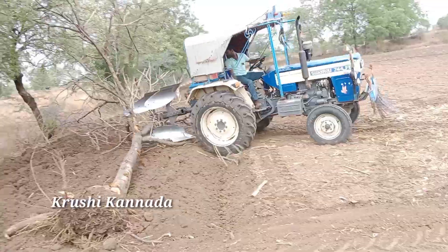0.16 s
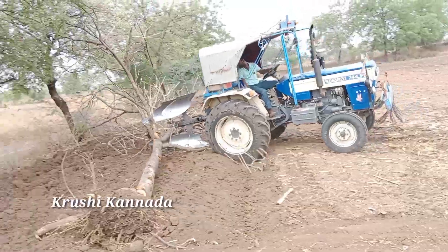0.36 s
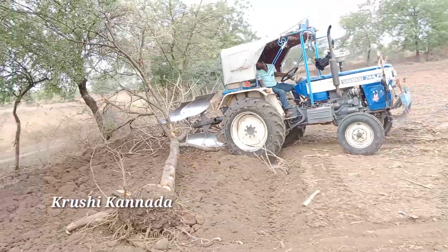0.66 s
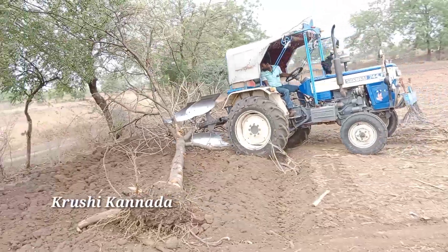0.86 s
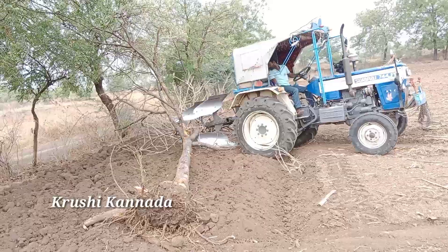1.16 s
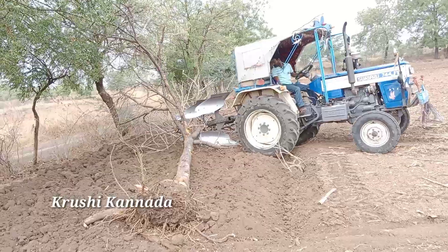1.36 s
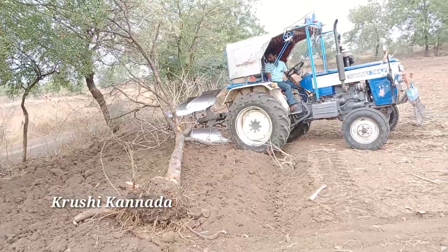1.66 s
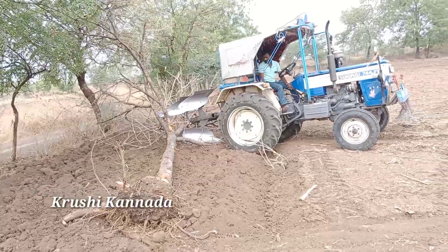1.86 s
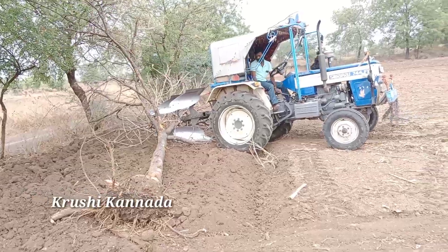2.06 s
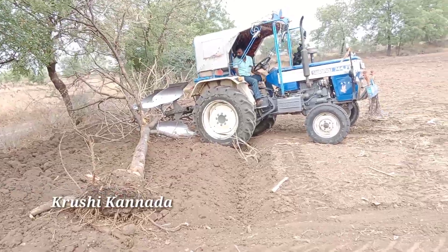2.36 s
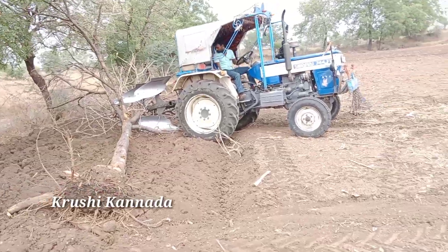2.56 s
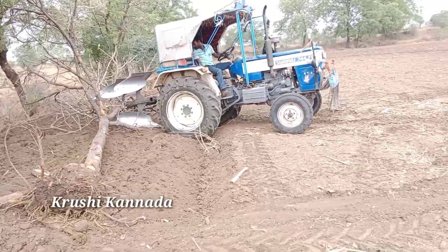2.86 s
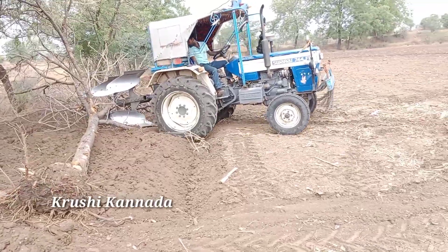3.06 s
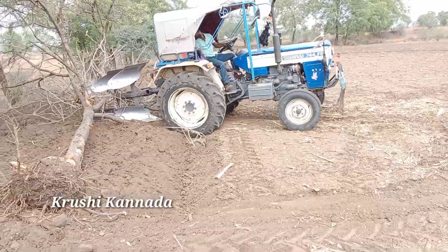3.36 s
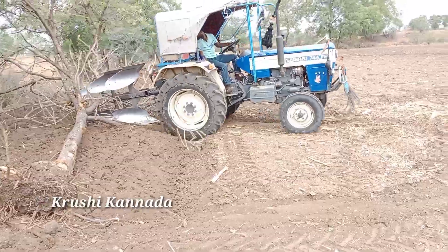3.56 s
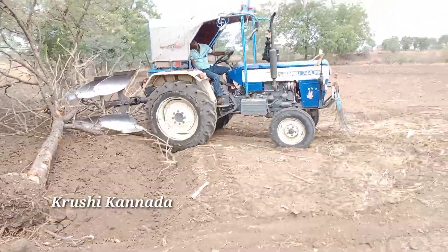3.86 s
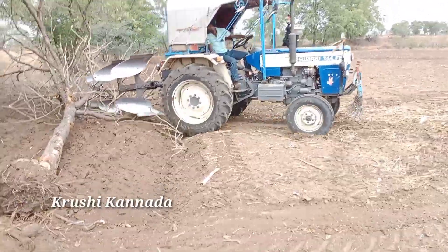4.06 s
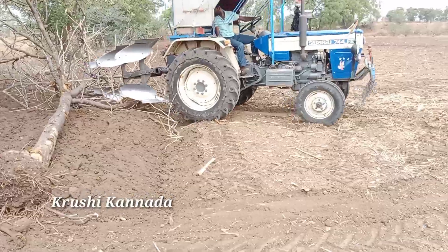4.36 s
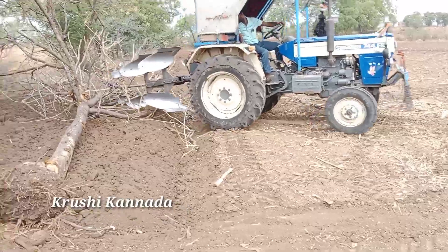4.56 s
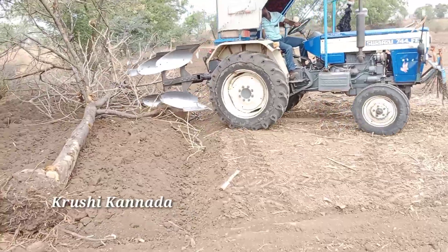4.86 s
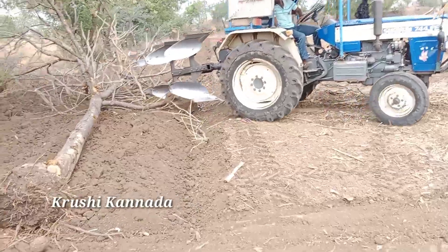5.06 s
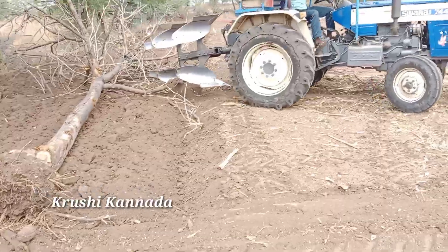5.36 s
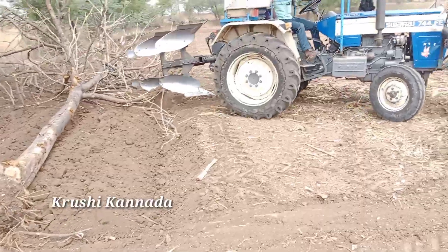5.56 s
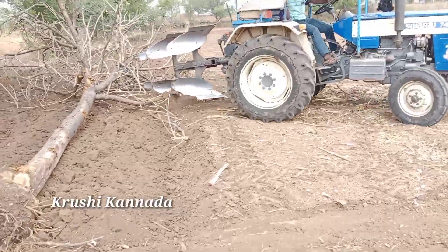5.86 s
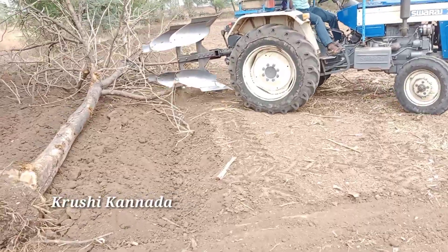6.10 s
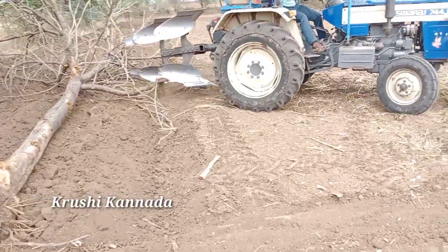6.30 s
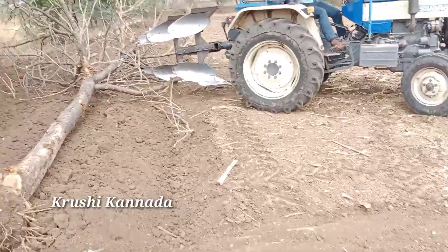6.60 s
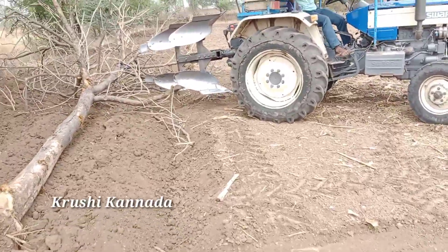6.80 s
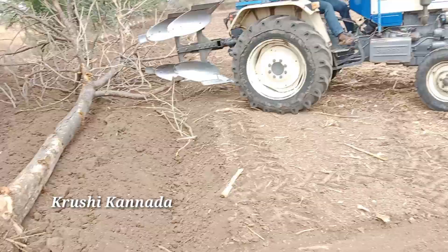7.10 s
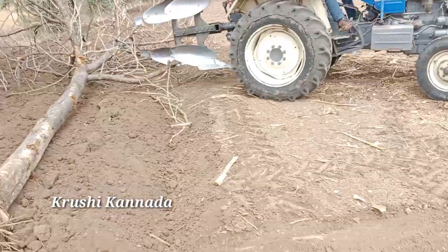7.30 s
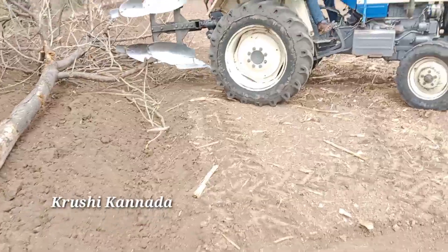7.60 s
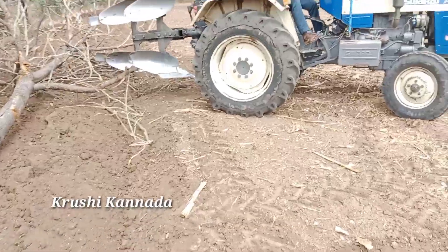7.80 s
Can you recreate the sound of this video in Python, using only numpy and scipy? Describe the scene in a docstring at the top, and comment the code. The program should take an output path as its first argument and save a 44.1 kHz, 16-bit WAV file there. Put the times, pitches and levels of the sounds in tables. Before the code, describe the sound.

In an open dry field, a three-cylinder diesel tractor pulls hard with loud barking exhaust, sharp wood cracks and low knocks. After a second it falls off to a soft, quick clatter with a faint gear whine, then surges again with rasping barks, scraping soil and branch squeaks. Finally it slows into uneven, honking chugs with small tin rattles. Mono microphone outdoors, a short distance away.

```python
"""Dry field: a three-cylinder diesel tractor drags its plough through a felled tree.
It pulls hard, eases off and slows, then labours: exhaust and intake are pulses timed by a firing table.
Block, bonnet and gears are noise shaped by the firings or narrow bands that follow engine speed.
Wood cracks and tin rattles in decaying noise bursts; low knocks and squeaks are gliding tones.
Dry soil and twigs crunch in treble noise and random ticks that follow the load."""
import sys
import numpy as np
from scipy import signal
from scipy.fft import rfft, irfft, next_fast_len
from scipy.io import wavfile
from scipy.ndimage import uniform_filter1d

SR = 44100
rng = np.random.default_rng(int(sys.argv[2]) if len(sys.argv) > 2 else 0)


def wav_out(sig):
    """Save sig, one row per channel (or a flat mono array), as 16-bit PCM at SR to the path in sys.argv[1]."""
    wavfile.write(sys.argv[1], SR, np.round(np.clip(np.atleast_2d(sig).T, -1, 1) * 32767).astype(np.int16))


N = 350154
T = np.arange(N) / SR  # [s]

# Crankshaft: (time [s], firings so far)
CRANK = [(-.017, 2), (.62, 17), (.926, 24), (1.548, 38), (1.947, 46), (2.41, 54), (2.735, 59), (3.154, 66),
         (4.065, 80), (4.74, 90), (5.45, 101), (6.075, 110), (6.481, 116), (6.9, 122), (7.973, 137)]
# Engine load: (time [s], load relative to full [dB])
LOAD = [(0, 1), (.45, 2.5), (.69, -2), (.93, -1), (1.07, -1), (1.11, -11), (1.2, -24), (1.7, -41.5),
        (2.525, -42), (2.545, -27.5), (2.72, -14.5), (3.13, -12.5), (3.18, -6), (3.55, -5.5), (3.67, -13),
        (3.9, -4), (4.15, -9), (5.42, -15.5), (5.56, -23.5), (6.12, -13.5), (6.45, -25), (7.94, -19.5)]
FULL_RATE_HZ = 23  # firings per second at full revs
# Lugging sets in between these times
LUG_FROM_S, LUG_FULL_S = 4.5, 7.17
# Plough draws nearer: exhaust puffs and ground noise gain level between these times
NEAR_FROM_S, NEAR_UNTIL_S, NEARER_DB = 4.65, 5.67, 6.5

# Air over the open field: (frequency [Hz], density [dB per Hz])
AIR_SPECTRUM = [(150, 3.5), (230, 5), (500, -11.5), (3600, -12.5), (7000, -21), (9300, -32)]
AIR_DB = -76

# Crunching soil and twigs: (frequency [Hz], density [dB per Hz])
CRUNCH_SPECTRUM = [(5600, -31.5), (6700, 4.5), (8400, 3.5), (9370, -21.5), (10200, -7.5), (15500, -23.5)]
# Sizzle at the very top: (time [s], level [dB])
SIZZLE = [(1.5, -70), (7.5, -72.5), (7.57, -59.5)]
# Level at full load and full revs, dB per dB of load, run-on after a load drop
CRUNCH_DB, CRUNCH_SLOPE, CRUNCH_RUN_ON_S = -49, 0.64, 0.17

# Plough scraping soil and roots: (time [s], level [dB])
SCRAPING = [(.72, -50), (.88, -39.5), (1.13, -64), (2.6, -76.5), (3.2, -67), (3.48, -60), (3.88, -54),
            (3.97, -40), (4.16, -63), (4.28, -50.5), (4.7, -52.5), (5.2, -68)]
# Scrape growl: (frequency [Hz], density [dB per Hz])
SCRAPE_SPECTRUM = [(150, -5.5), (220, 0.5), (400, -0.5), (500, -11)]

# Branch squeaks and thin high peeps, perhaps of birds:
# (time [s], length [s], level [dB], start [Hz], end [Hz])
SQUEAKS = [(3.701, 0.12, -58, 3760, 2850), (3.992, .15, -56, 3170, 2730), (4.26, 0.13, -50.5, 3910, 2950),
           (5.308, 0.073, -52.5, 11600, 11650), (6.058, 0.09, -64, 3810, 3800),
           (7.322, .07, -60, 11700, 11650)]
# Groans of the dragged trunk: (time [s], length [s], level [dB], pitch [Hz])
GROANS = [(1.273, 0.14, -49.5, 338)]
SQUEAK_FLUTTER_HZ, SQUEAK_BEND = 40, 1.7  # rms pitch flutter; glide exponent of time

# Low knocks, some of them thumps of hard firings: (time [s], level [dB], settling pitch [Hz])
KNOCKS = [(.251, -28, 350), (0.382, -19, 163.5), (0.967, -27, 284), (1.008, -31, 276), (3.342, -30, 310),
          (3.749, -37, 270), (3.946, -30, 240), (3.989, -34, 270)]
# Cracking wood: (time [s], level [dB], decay time [s])
CRACKS = [(.135, -16, .0035), (0.156, -20, 0.0063), (.249, -19, 0.013), (0.263, -21, 0.019),
          (0.393, -21, 0.011), (0.403, -23.5, 0.025), (0.579, -33, 0.043), (0.861, -25, 0.024),
          (1.188, -32, 0.022), (1.353, -45, 0.02), (3.314, -31.5, 0.017), (3.337, -31, 0.025),
          (3.806, -35.5, 0.029), (4.593, -41, 0.034), (4.746, -39.5, 0.028), (6.768, -45.5, 0.017)]
# Torn wood: (frequency [Hz], density [dB per Hz])
WOOD_SPECTRUM = [(200, -25.5), (385, -6.5), (525, -19.5), (677, -4.5), (1680, 1), (3180, -8), (4750, -19),
                 (7220, -9.5), (9310, -19.5), (15500, -25.5)]

# Loose tin sheet: (time [s], level before the swell [dB])
RATTLES = [(5.311, -42), (5.376, -40), (5.715, -52), (7.39, -43.5), (7.604, -49), (7.82, -52)]

# Timing-gear whine: (time [s], level [dB])
WHINE = [(1.38, -60), (1.52, -52.5), (1.72, -65.5), (2.1, -57.5), (2.25, -73)]
GEAR_TEETH, GEAR_WIDTH_HZ = 41, 110  # tooth contacts per firing; width of the whine

# Engine block clatter: (frequency [Hz], density [dB per Hz])
BLOCK_SPECTRUM = [(540, -36.5), (620, -3), (720, 3), (926, -0.5), (1020, 2), (1250, -7.5), (1410, -3.5),
                  (1640, -8), (1950, -31)]
# Ringing panels: (frequency [Hz], width per filter pass [Hz], relative level [dB])
PANELS = [(718, 70, 0), (1050, 100, -9), (1448, 42, -10), (1636, 26, -14), (2200, 44, -14.5)]
# Level at full load, dB per dB of load, run-on after a load drop
CLATTER_DB, CLATTER_SLOPE, CLATTER_RUN_ON_S = -34.5, 0.7, 0.041

# Thin bonnet steel: (frequency [Hz], width [Hz], relative level [dB])
BONNET_MODES = [(1666, 19, 3.5), (2476, 32, -6), (2790, 15, -10), (3050, 21, -14), (3556, 38, -13.5)]
BONNET_DB, BONNET_SLOPE = -54, 0.88  # reference at full load; dB per dB of load

# Gas rasp: (frequency [Hz], density [dB per Hz])
RASP_SPECTRUM = [(1400, 4), (1900, 4.5), (2100, -1.5), (2480, -1), (3050, -9), (3350, -19), (3700, -12.5),
                 (4400, -38)]
# Rasp of each cylinder when fully lugging: (level [dB])
CYLINDERS_DB = [4, 1, -3]
RASP_DB, RASP_SLOPE = -40, 0.98  # level at full load; dB per dB of load

# Air gulp of each cylinder at the usual lugging load: (level [dB])
GULPS_DB = [-39.5, -37, -26.5]
# Spread between gulps, dB per dB of load, usual lugging load
GULP_SPREAD_DB, GULP_SLOPE, LUG_LOAD_DB = -0.15, 0.55, -19.5

# Hardest firings: (time [s], bark [dB], whistle [dB])
BLASTS = [(.021, -22.5, -20), (.192, -24, -31), (.444, -36, -24), (.529, -29, -29.5), (.919, -21, -20),
          (.964, -24.5, -31), (1.007, -22, -35), (1.052, -26, -41), (3.148, -29.5, -34),
          (3.213, -28.5, -30.5), (3.279, -24, -27.5), (3.411, -27.5, -27), (3.543, -28, -25.5),
          (3.737, -33.5, -28), (3.864, -25, -28.5), (4.330, -25, -32)]
# Exhaust bark: (frequency [Hz], density [dB per Hz])
BARK_SPECTRUM = [(130, -18), (334, -4.5), (520, -21.5), (710, 14), (1100, -12), (1900, 0.5), (2150, 8.5),
                 (2660, -18), (3050, -8.5), (4700, -38), (5740, -13.5), (13000, -30)]
# Ordinary barks: level at full load and revs, dB per dB of load, load threshold
BARK_DB, BARK_SLOPE, BARK_FROM_DB = -34, 1, -11.5
# Whistle against bark, spread between firings, dB per dB of slowing
WHISTLE_DB, BARK_SPREAD_DB, BARK_PER_SLOWING = -8.5, 3.5, 2.25

# Exhaust puff: (frequency [Hz], density [dB per Hz])
PUFF_SPECTRUM = [(100, 3), (177, -9.5), (370, -5.5), (530, -9.5), (700, -11)]
# Boom reference at full load and revs, dB per dB of load, dB per dB of speed, floor
BOOM_DB, BOOM_SLOPE, BOOM_PER_SPEED, IDLE_BOOM_DB = -37, 1.204, 1.47, -72.5
PUFF_DB, PUFF_SLOPE = -42.5, 1  # puff reference; dB per dB of exhaust push

# Microphone dip; recorder band limit
DIP_HZ, DIP_WIDTH_HZ, EDGE_HZ = 4790, 770, 15650


def amp(db):
    """Amplitude factor of a level in dB."""
    return 10 ** (np.asarray(db) / 20)


def unit(x):
    """Scale to rms 1."""
    return x / np.sqrt(np.mean(x ** 2) + 1e-20)


def curve(rows, column=1):
    """Table column interpolated over the scene."""
    rows = np.asarray(rows)
    return np.interp(T, rows[:, 0], rows[:, column])


def add(mix, s, sound):
    """Add a sound in place from time s, cut at the end."""
    part = mix[max(round(s * SR), 0):][:len(sound)]
    part += sound[:len(part)]


def colour(x, points):
    """Minimum-phase filter with the given spectrum; white noise keeps its power."""
    hz, db = np.transpose(points)
    f = abs(np.fft.fftfreq(4096, 1 / SR)) + 1
    octaves_outside = np.maximum(np.log2(hz[0] / f), 0) + np.maximum(np.log2(f / hz[-1]), 0)
    gain_db = np.interp(np.log(f), np.log(hz), db) - 60 * octaves_outside
    log_gain = np.log(amp(np.maximum(gain_db, -90)))
    taps = np.fft.ifft(np.exp(np.conj(signal.hilbert(log_gain)))).real
    return signal.oaconvolve(x, taps / np.linalg.norm(taps))[:N]


def resonate(x, hz, width_hz):
    """One resonance with peak gain 1."""
    return signal.lfilter(*signal.iirpeak(hz, hz / width_hz, fs=SR), x)


def wander(rate_hz):
    """Smooth random signal of rms 1: noise under a Gaussian low-pass."""
    size = next_fast_len(N, True)
    lowpass = np.exp(-(np.fft.rfftfreq(size, 1 / SR) / rate_hz) ** 2)
    return unit(irfft(rfft(rng.standard_normal(size)) * lowpass, size)[:N])


def grit(clump_db, rate_hz):
    """Noise whose level wanders, so that it clumps; rms 1."""
    return unit(rng.standard_normal(N) * amp(clump_db * wander(rate_hz)))


def mottle(x, depth_db):
    """Random gain drifts in narrow patches of time and frequency; rms 1."""
    _, _, z = signal.stft(x, nperseg=1024, noverlap=768)
    patches = rng.standard_normal(z.shape)
    for _ in range(2):
        patches = uniform_filter1d(patches, size=4, axis=0)
        patches = uniform_filter1d(patches, size=8, axis=1)
    shaded = z * amp(depth_db * unit(patches))
    return unit(signal.istft(shaded, nperseg=1024, noverlap=768)[1][:N])


def strokes(lead_s):
    """Current firing number, its age [s], and its phase (0 to 1) towards the next."""
    turns = np.interp(T + lead_s, *np.transpose(CRANK))
    phase = turns % 1
    age_s = phase / np.maximum(np.gradient(turns) * SR, 1)
    return turns.astype(int), age_s, phase


def beat(lead_s, rise_s, duty, between):
    """Envelope that rises at each firing, fades over a share of its cycle and keeps a floor; rms 1."""
    number, age_s, phase = strokes(lead_s)
    size = amp(1.5 * rng.standard_normal(256))[number]
    onset = 1 - np.exp(-(age_s / rise_s) ** 2)
    fade = np.exp(-(phase / duty) ** 1.5)
    return unit(size * onset * fade + between)


def firings(lead_s):
    """Every whole firing: (number, start [s])."""
    s, count = np.transpose(CRANK)
    numbers = np.arange(int(count[0]) + 1, int(count[-1]))
    return list(zip(numbers, np.interp(numbers, count, s) - lead_s))


def lugging():
    """0 while the engine runs freely, rising to 1 as it labours at low revs."""
    return np.clip((T - LUG_FROM_S) / (LUG_FULL_S - LUG_FROM_S), 0, 1)


def roar():
    """Engine-noise floor between strokes; it thins with lugging."""
    return .5 - .3 * lugging()


def speed_db():
    """Smoothed firing rate relative to full revs [dB]."""
    rate_hz = np.gradient(curve(CRANK)) * SR
    return 20 * np.log10(uniform_filter1d(rate_hz, size=SR // 4) / FULL_RATE_HZ)


def run_on(seconds):
    """Load [dB] felt by moving parts: rises at once, falls with a lag."""
    load_db, keep = curve(LOAD), np.exp(-1 / (seconds * SR))
    return np.maximum(load_db, signal.lfilter([1 - keep], [1, -keep], load_db))


def nearness():
    """Gain of puffs and ground noise as the plough draws nearer."""
    return amp(NEARER_DB * np.clip((T - NEAR_FROM_S) / (NEAR_UNTIL_S - NEAR_FROM_S), 0, 1))


def air():
    """Steady faint wash of coloured noise."""
    return amp(AIR_DB) * colour(rng.standard_normal(N), AIR_SPECTRUM)


def ground(snaps_per_s=60, per_speed=2.8, splinters_db=-45, splinters_slope=1.56):
    """Soil crunches, twigs tick and wood splinters with load; firing-timed hiss and a top sizzle join."""
    drag_db = run_on(CRUNCH_RUN_ON_S)
    hiss = grit(2.54, 150) * beat(lead_s=0.0085, rise_s=0.0032, duty=0.17, between=0.56)
    hiss = mottle(colour(hiss, CRUNCH_SPECTRUM), 3.5)
    tick_size = amp(6 * np.minimum(rng.exponential(1, N), 3.5))
    ticks = (rng.random(N) < snaps_per_s / SR) * tick_size
    tick_decay = signal.lfilter([1], [1, -np.exp(-1 / (0.0023 * SR))], ticks)
    twigs = unit(tick_decay * rng.standard_normal(N))
    crunch = hiss + amp(-5.5) * colour(twigs, CRUNCH_SPECTRUM)
    crunch *= amp(CRUNCH_DB + CRUNCH_SLOPE * drag_db + per_speed * speed_db())
    # steep slope: splinters count only under heavy load
    splinters = amp(splinters_db + splinters_slope * drag_db) * colour(grit(5, 300), WOOD_SPECTRUM)
    sizzle = unit(resonate(resonate(grit(4, 6), 15000, 900), 15000, 900))
    return nearness() * crunch + splinters + amp(curve(SIZZLE)) * sizzle


def scrape():
    """The plough share judders through soil and roots: lumpy low noise."""
    growl = mottle(colour(grit(4, 90), SCRAPE_SPECTRUM), 4.2)
    return amp(curve(SCRAPING)) * growl


def gliding_tone(length_s, start_hz, end_hz):
    """Tone with an accelerating glide, fluttering pitch and stuttering level, as in stick-slip."""
    count = int(length_s * SR)
    flutter = unit(uniform_filter1d(rng.standard_normal(SR // 4), size=90))[:count]
    stutter = unit(uniform_filter1d(rng.standard_normal(SR // 4), size=90))[:count]
    glide = np.linspace(0, 1, count) ** SQUEAK_BEND
    hz = start_hz + (end_hz - start_hz) * glide + SQUEAK_FLUTTER_HZ * flutter
    tone = np.sin(2 * np.pi * np.cumsum(hz) / SR)
    return signal.windows.tukey(count) * unit(amp(2 * stutter)) * tone


def squeaks():
    """Stick-slip squeaks of branches; thin high peeps, perhaps of birds; the trunk groans."""
    out = np.zeros(N)
    for s, length_s, db, start_hz, end_hz in SQUEAKS:
        add(out, s, amp(db) * gliding_tone(length_s, start_hz, end_hz))
    for s, length_s, db, hz in GROANS:
        add(out, s, amp(db) * gliding_tone(length_s, hz, hz))
    return out


def knocks(rise_s=0.0027, decay_s=0.017):
    """Low knocks, some of them thumps of hard firings: damped thuds that drop in pitch."""
    t, out = T[:SR // 8], np.zeros(N)
    swell = (1 - np.exp(-t / rise_s)) * np.exp(-t / decay_s)
    for s, db, hz in KNOCKS:
        waver = unit(uniform_filter1d(rng.standard_normal(len(t)), size=120))
        pitch_hz = hz * (1 + np.exp(-t / .005) + .3 * waver)
        add(out, s, amp(db) * swell * np.sin(2 * np.pi * np.cumsum(pitch_hz) / SR))
    return out


def cracks():
    """Dry wood snaps: decaying bursts of clumped noise from tearing fibres."""
    t, force = T[:SR // 6], np.zeros(N)
    for s, db, decay_s in CRACKS:
        add(force, s, amp(db) * np.exp(-t / decay_s))
    return colour(force * grit(3.2, 500), WOOD_SPECTRUM)


def rattles(lash_db=-53, rise_s=0.01, decay_s=0.021, low_hz=2050, high_hz=3150):
    """Slack parts chatter between strokes when lugging; a loose tin sheet rattles in noise bursts."""
    _, _, phase = strokes(lead_s=0)
    lash = mottle(colour(grit(4, 70), BLOCK_SPECTRUM), 4) * np.sin(np.pi * phase) ** 2
    t, force = T[:SR // 6], np.zeros(N)
    for s, db in RATTLES:
        add(force, s, amp(db) * (1 - np.exp(-t / rise_s)) * np.exp(-t / decay_s))
    band = signal.butter(7, [low_hz, high_hz], "band", fs=SR, output="sos")
    tin = mottle(signal.sosfilt(band, rng.standard_normal(N)), 4)
    return amp(lash_db) * np.sqrt(lugging()) * lash + force * tin


def gears():
    """Tooth contacts whine in a narrow noise band that sinks with the revs."""
    hz = GEAR_TEETH * FULL_RATE_HZ * amp(speed_db())
    angle = 2 * np.pi * np.cumsum(hz) / SR
    in_phase = wander(GEAR_WIDTH_HZ / 2) * np.cos(angle)
    quadrature = wander(GEAR_WIDTH_HZ / 2) * np.sin(angle)
    return amp(curve(WHINE)) * (in_phase + quadrature)


def block(panels_db=-54, panels_per_speed=3.9, panels_steady=0.87):
    """Combustion and valve gear rattle the block with load; panels ring with speed, even off load."""
    blows = grit(1.5, 200) * beat(lead_s=.008, rise_s=.005, duty=.55, between=roar())
    clatter = mottle(colour(blows, BLOCK_SPECTRUM), 3.2)
    clatter *= amp(CLATTER_DB + CLATTER_SLOPE * run_on(CLATTER_RUN_ON_S))
    shake = blows + panels_steady * rng.standard_normal(N)
    ring = np.zeros(N)
    for hz, width_hz, db in PANELS:
        ring += amp(db) * unit(resonate(resonate(shake, hz, width_hz), hz, width_hz))
    return clatter + amp(panels_db + panels_per_speed * speed_db()) * ring


def bonnet(cylinder, slack_db=-27):
    """Strokes strike thin steel; its modes ring in random shares and fade faster below slack_db of load."""
    load_db = curve(LOAD)
    number, _, _ = strokes(lead_s=.007)
    blows = rng.standard_normal(N) * beat(lead_s=.007, rise_s=.002, duty=.18, between=.02)
    blows *= cylinder * amp(BONNET_DB + BONNET_SLOPE * load_db + np.minimum(load_db - slack_db, 0))
    out = np.zeros(N)
    for hz, width_hz, db in BONNET_MODES:
        share = amp(db + 4 * rng.standard_normal(256))[number]
        mode = resonate(resonate(share * blows, hz, width_hz), hz, 10 * width_hz)
        out += np.sqrt(SR / np.pi / width_hz) * mode  # offsets the power lost in a narrow band
    return out


def rasp(idle_db=-82, dull_hz=3500):
    """Firing gas rasps and the bonnet rings; lugging dulls the gas and makes the cylinders unequal."""
    number, _, _ = strokes(lead_s=.008)
    lug = lugging()
    cylinder = amp(lug * np.take(CYLINDERS_DB, number, mode="wrap"))
    floor = roar() * (1 - lug / 2) / 2
    blows = grit(1.5, 200) * beat(lead_s=.008, rise_s=.006, duty=.5, between=floor)
    gas = mottle(colour(blows, RASP_SPECTRUM), 4.5)
    dull = signal.sosfiltfilt(signal.butter(8, dull_hz, fs=SR, output="sos"), gas)
    gas += np.sqrt(lug) * (dull - gas)
    level = np.hypot(amp(RASP_DB + RASP_SLOPE * curve(LOAD)), amp(idle_db))
    return level * cylinder * gas + bonnet(cylinder)


def honks(pitch_hz=995, echo_hz=1060, echo_delay_s=0.0111, echo=0.56, width_s=0.0069, onset_s=0.0011):
    """Lugging gulps sound the intake pipe; three ever weaker echoes follow as the pitch rises."""
    t = T[:SR // 14]
    partials = [(1, -2), (1.4, -25.5), (1.67, -26.5)]  # (pitch multiple, level [dB])
    out, strength = np.zeros(N), lugging() ** 0.38
    for number, s in firings(lead_s=.0068):
        chance = rng.standard_normal(len(t))
        hz = np.interp(t, [echo_delay_s, 2 * echo_delay_s], [pitch_hz, echo_hz])
        turns = np.cumsum(hz + 35 * unit(uniform_filter1d(chance, size=150))) / SR
        tone = sum(amp(db) * np.sin(2 * np.pi * k * turns) for k, db in partials)
        delay_s = echo_delay_s * amp(0.55 * chance[0])
        swell = np.zeros(len(t))
        for k in range(4):
            spread_s = width_s * (.6 if k else 1)
            swell += echo ** k * np.exp(-((t - .006 - k * delay_s) / spread_s) ** 2)
        swell *= 1 - np.exp(-(t / onset_s) ** 2)
        effort_db = GULP_SLOPE * (np.interp(s, *np.transpose(LOAD)) - LUG_LOAD_DB)
        size = amp(GULPS_DB[number % len(GULPS_DB)] + effort_db + GULP_SPREAD_DB * chance[1])
        add(out, s, strength[round(s * SR)] * size * swell * tone)
    return out


def ordinary_barks():
    """Firings above the load threshold and clear of a blast: (time [s], bark [dB], whistle [dB])."""
    rows, load_db, speed = [], curve(LOAD), speed_db()
    for _, s in firings(lead_s=0.0056):
        at = round(s * SR)
        db = BARK_DB + BARK_SLOPE * load_db[at] - BARK_PER_SLOWING * speed[at]
        db += BARK_SPREAD_DB * rng.standard_normal()
        clear = all(abs(s - blast[0]) > .02 for blast in BLASTS)
        if load_db[at] > BARK_FROM_DB and clear:
            rows.append((s, db, db + WHISTLE_DB))
    return rows


def barks(whistle_hz=2350, fall_hz=520, glide_s=0.0078):
    """Hard firings blast from the stack: a noise burst with a short falling whistle."""
    t = T[:SR // 12]
    swell = np.exp(-((t - .0062) / .005) ** 2)
    blast = .66 * swell + .38 * (1 - np.exp(-t / .008)) * np.exp(-t / .022)
    gas, whistle = np.zeros(N), np.zeros(N)
    for s, bark_db, whistle_db in BLASTS + ordinary_barks():
        add(gas, s, amp(bark_db) * blast)
        waver = unit(uniform_filter1d(rng.standard_normal(len(t)), size=60))
        hz = whistle_hz - fall_hz * (1 - np.exp(-t / glide_s)) + 50 * waver
        add(whistle, s, amp(whistle_db) * swell * np.sin(2 * np.pi * np.cumsum(hz) / SR))
    return colour(gas * rng.standard_normal(N), BARK_SPECTRUM) + whistle


def exhaust():
    """Each firing rings the silencer and puffs gas; both grow with load and speed."""
    number, _, _ = strokes(lead_s=0.0035)
    pulses = np.diff(number, prepend=number[0]) * amp(1.5 * wander(20))
    t = T[:SR // 4]
    modes = [(88.3, 8.0, 0.011), (129.0, -7, 0.0098)]  # (frequency [Hz], level [dB], decay time [s])
    ring = sum(amp(db) * np.sin(2 * np.pi * hz * t) * np.exp(-t / decay_s) for hz, db, decay_s in modes)
    ring *= 1 - np.exp(-t / 0.011)
    ring = signal.sosfilt(signal.butter(1, 45, "high", fs=SR, output="sos"), ring)
    boom = unit(signal.oaconvolve(pulses, ring)[:N])
    puff = rng.standard_normal(N) * beat(lead_s=0.011, rise_s=0.013, duty=0.78, between=0.57)
    puff = mottle(colour(puff, PUFF_SPECTRUM), 4)
    push_db = BOOM_SLOPE * curve(LOAD) + BOOM_PER_SPEED * speed_db() - 5.0 * lugging() ** .5
    push = np.hypot(amp(push_db), amp(IDLE_BOOM_DB - BOOM_DB))
    return amp(BOOM_DB) * push * boom + amp(PUFF_DB) * push ** PUFF_SLOPE * nearness() * puff


def scene():
    """All layers summed to one channel."""
    surroundings = air() + ground() + scrape()
    single_events = squeaks() + knocks() + cracks()
    engine = rattles() + gears() + block() + rasp() + honks() + barks() + exhaust()
    return (surroundings + single_events + engine)[None]


def record(dry):
    """Microphone notch in the treble, then the recorder's low-pass."""
    heard = dry - resonate(dry, DIP_HZ, DIP_WIDTH_HZ)
    lowpass = signal.firwin(511, EDGE_HZ, window=("kaiser", 9), fs=SR)
    return signal.oaconvolve(heard, lowpass[None], "same")


dry = scene()
out = record(dry)
wav_out(out)
```